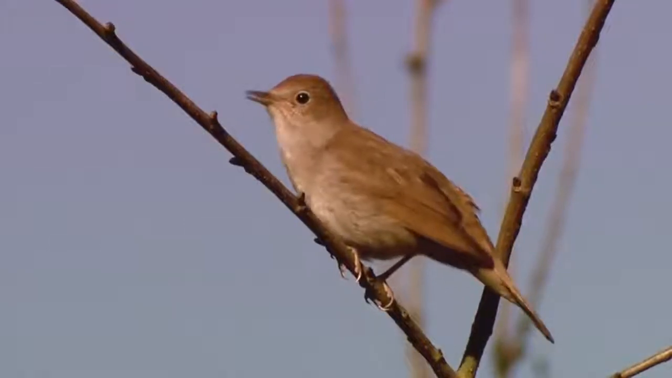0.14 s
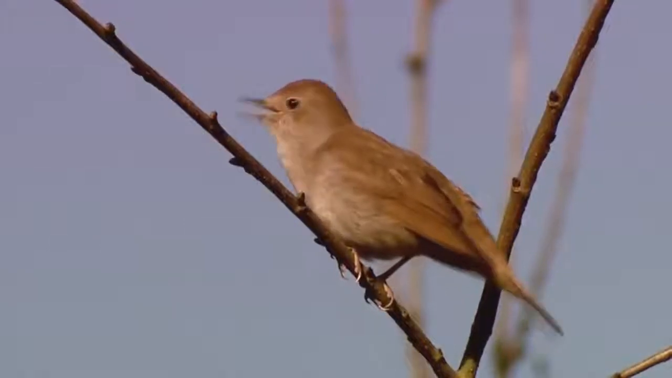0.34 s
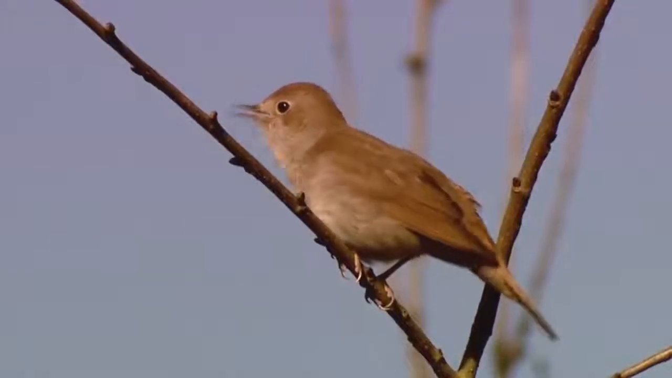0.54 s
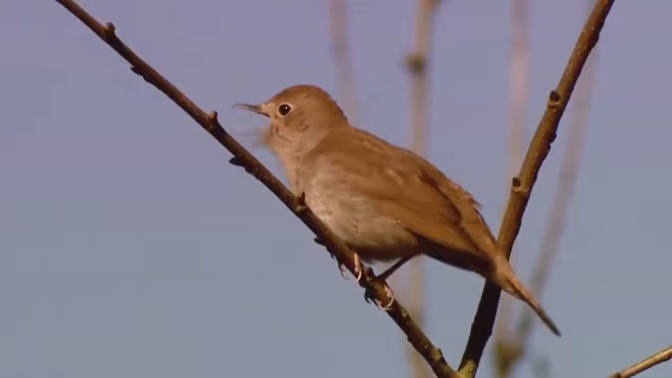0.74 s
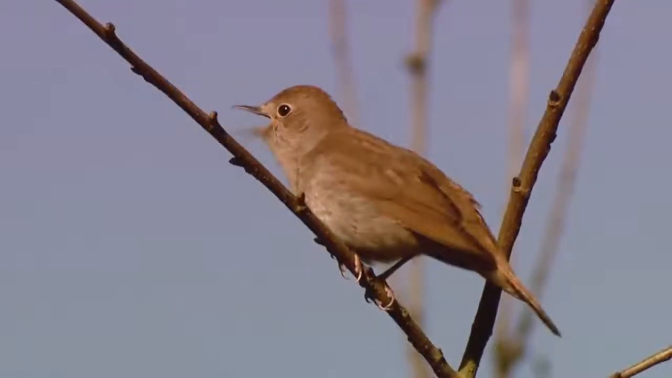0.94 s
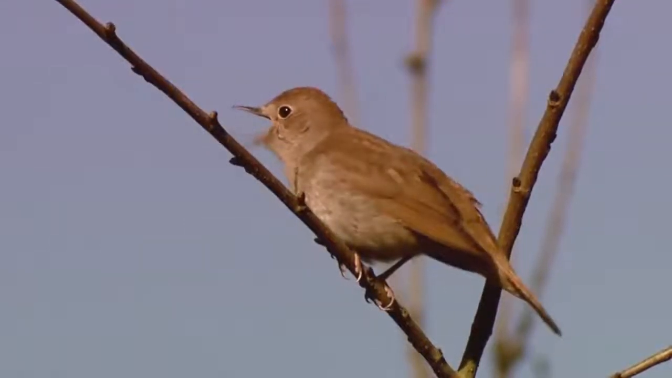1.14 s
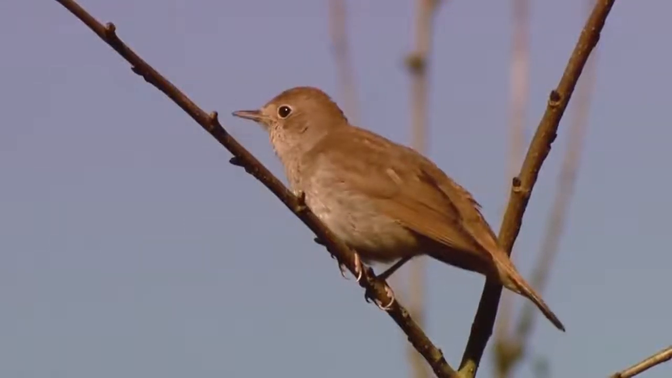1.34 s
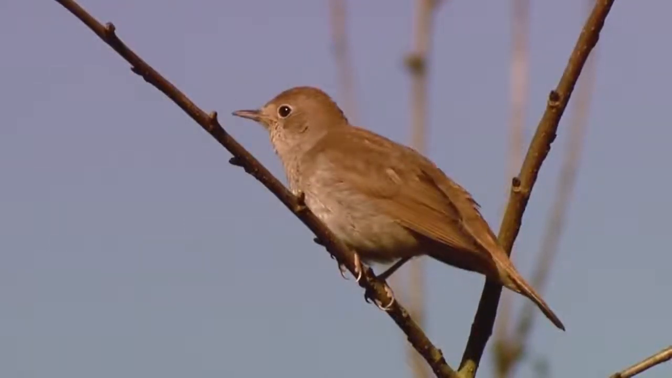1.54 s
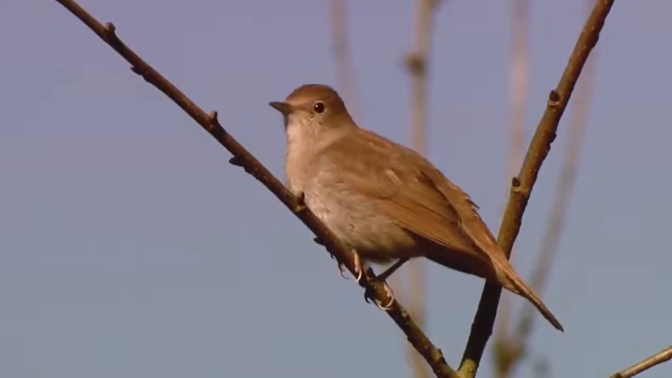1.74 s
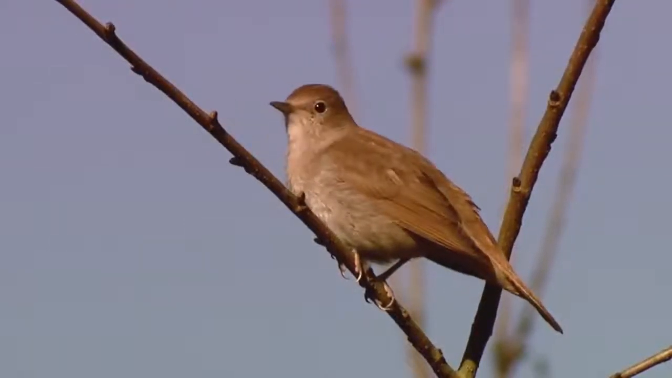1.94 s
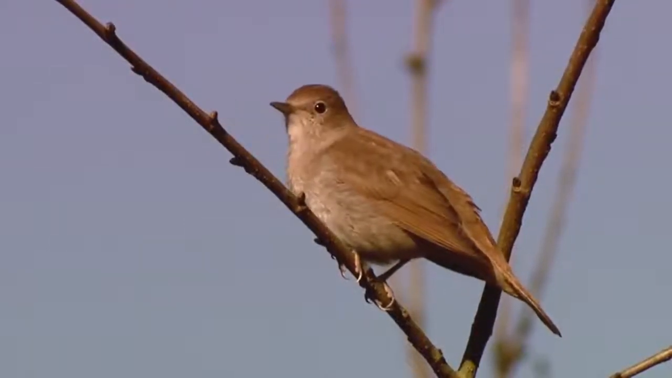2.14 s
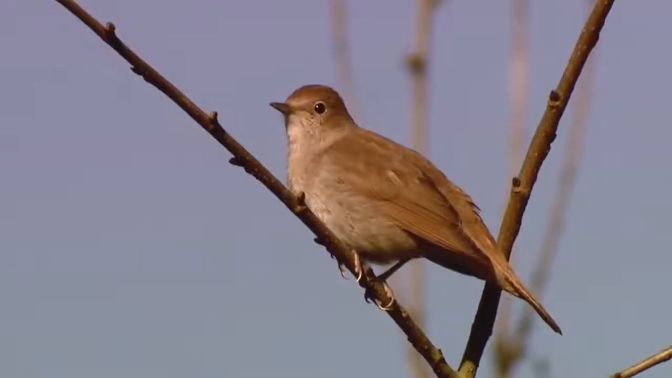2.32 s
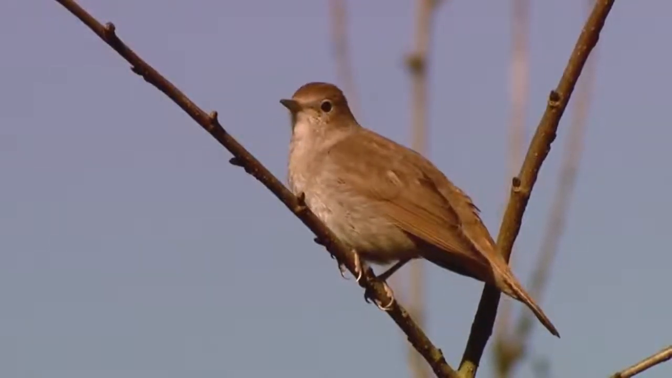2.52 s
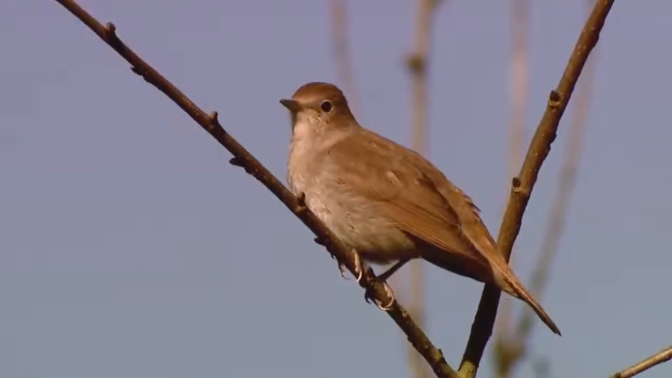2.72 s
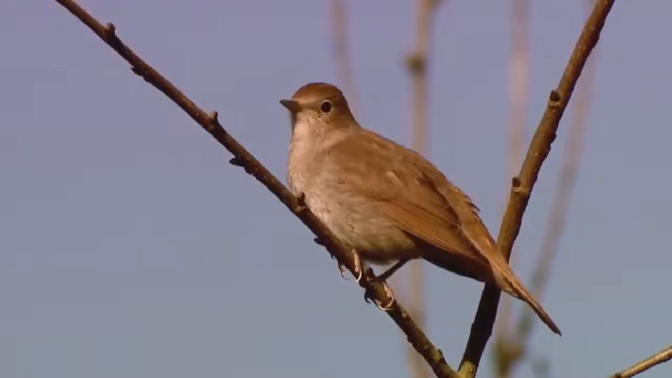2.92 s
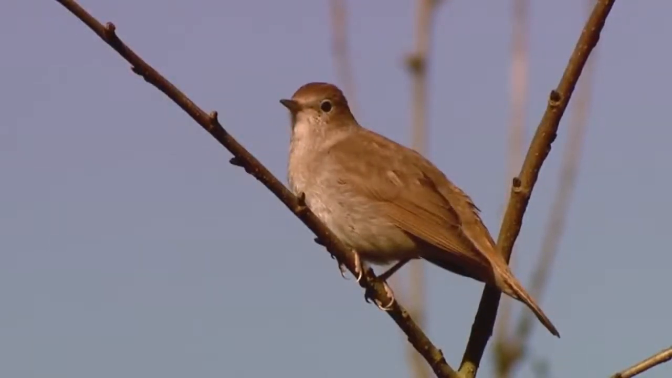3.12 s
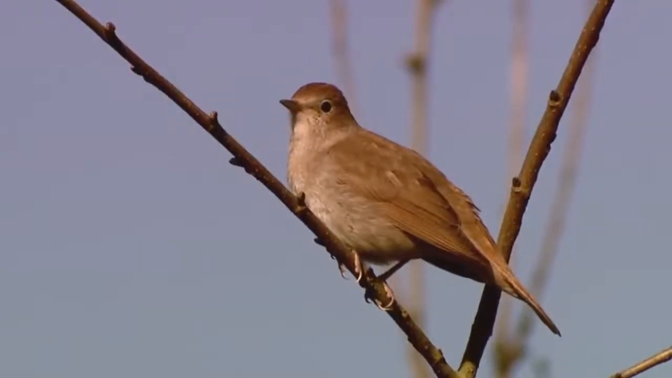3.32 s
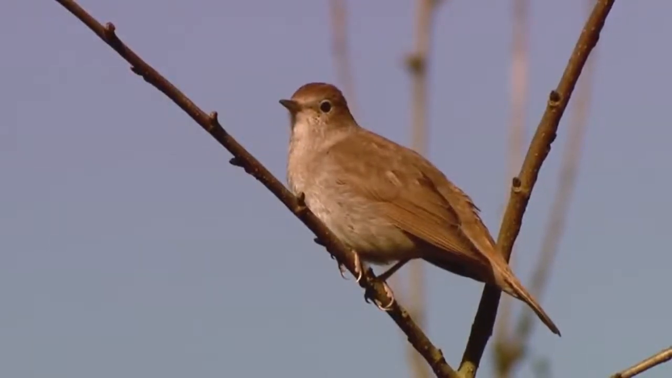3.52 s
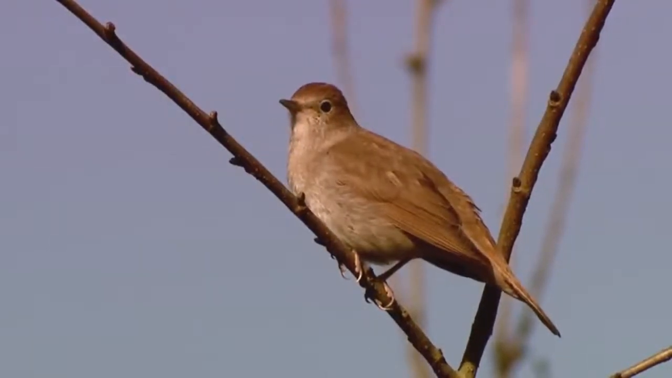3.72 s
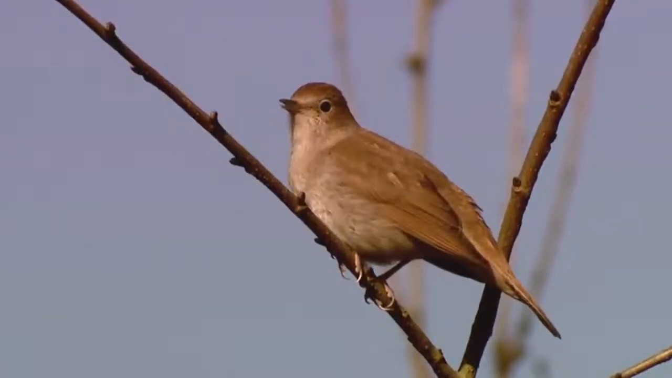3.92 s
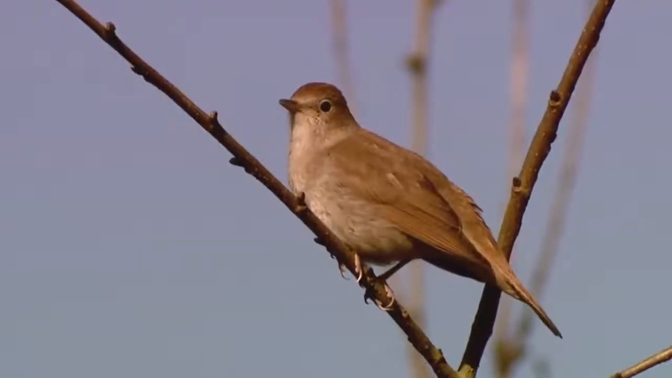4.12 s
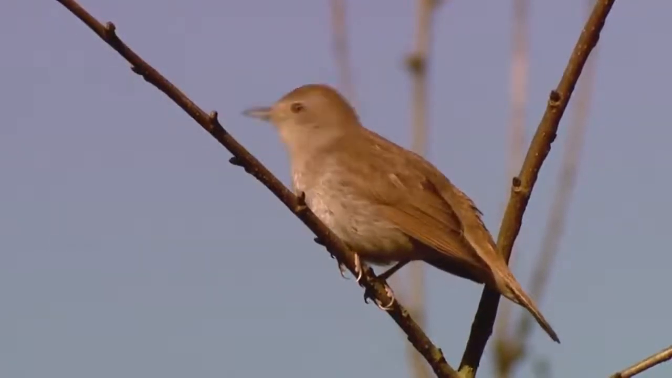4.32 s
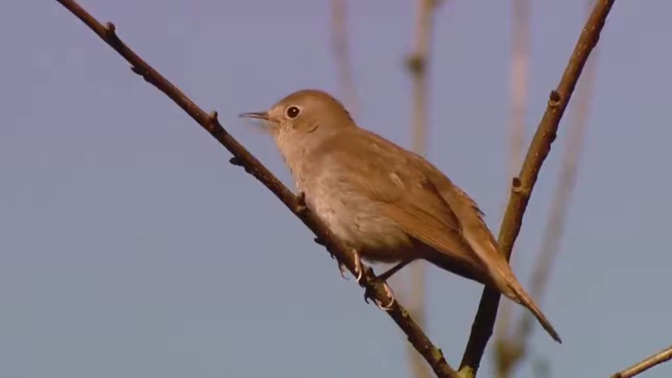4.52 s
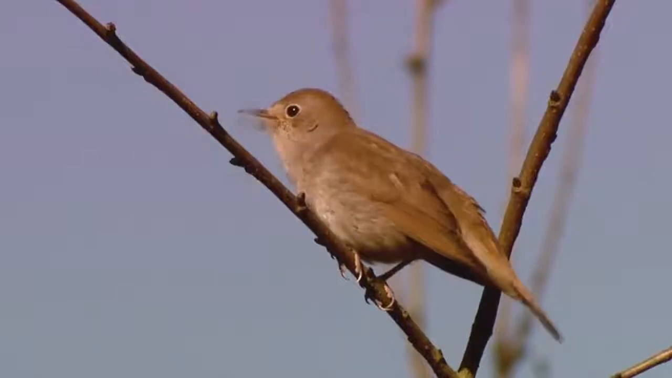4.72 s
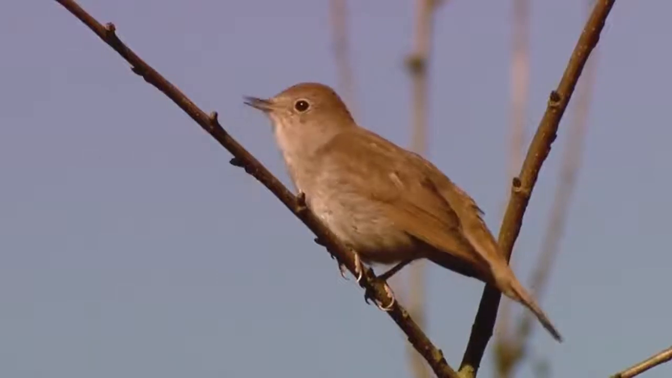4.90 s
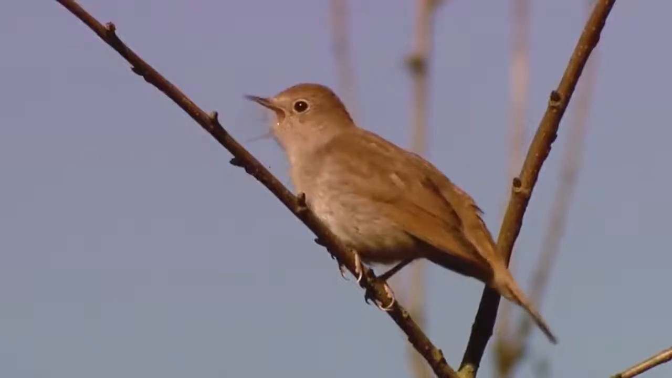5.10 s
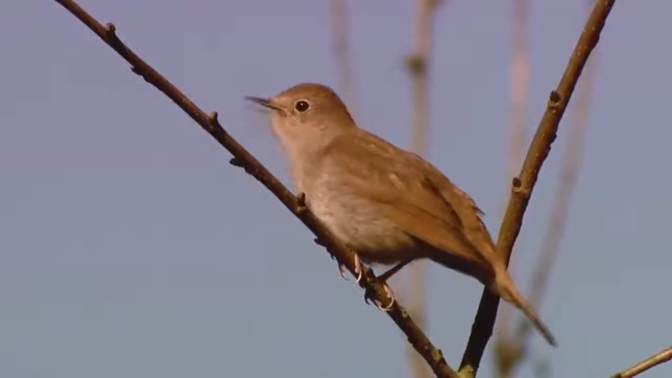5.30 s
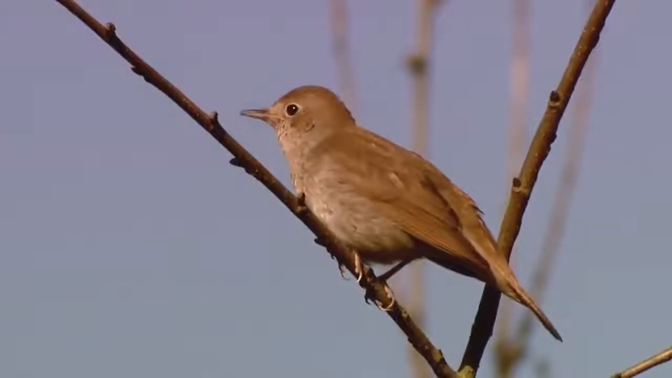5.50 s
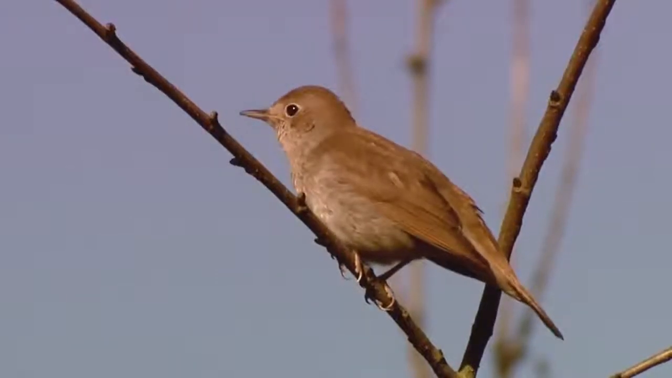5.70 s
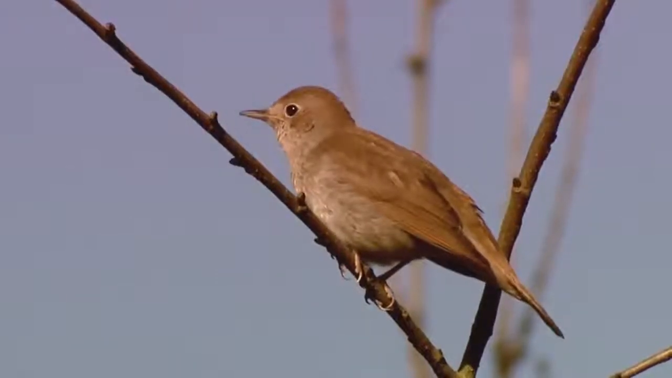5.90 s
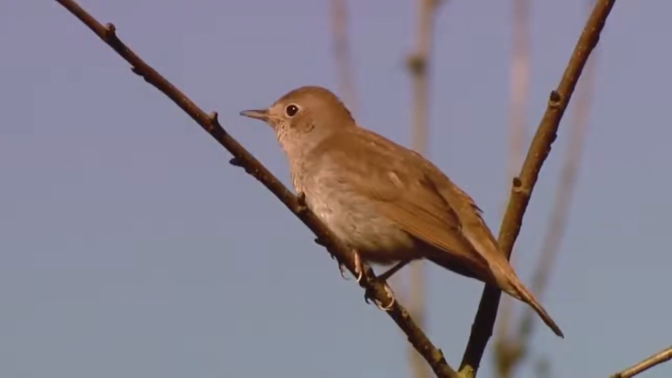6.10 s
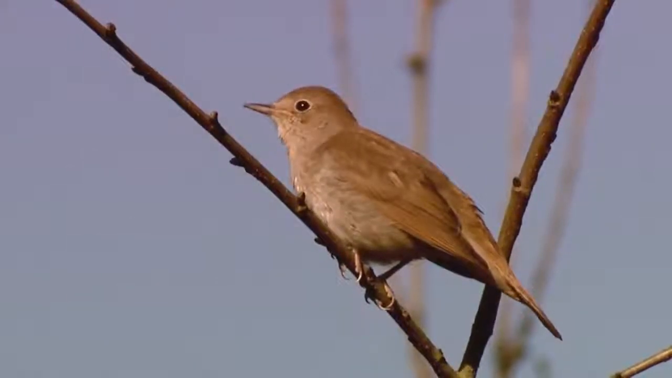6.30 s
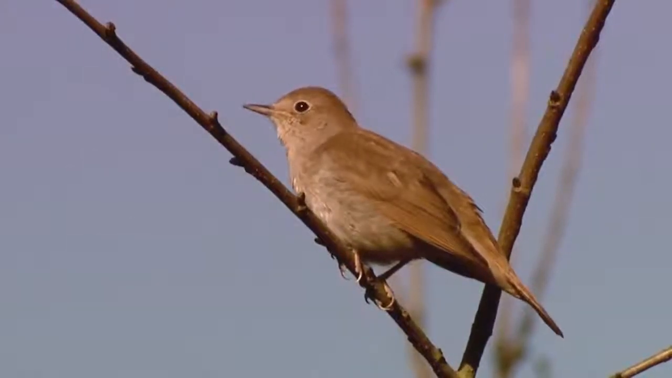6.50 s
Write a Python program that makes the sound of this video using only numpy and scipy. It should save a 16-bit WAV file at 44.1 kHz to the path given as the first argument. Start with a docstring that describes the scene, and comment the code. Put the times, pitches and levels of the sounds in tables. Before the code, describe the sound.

Close, nearly dry birdsong at a woodland edge, its loudest notes slightly overloaded. Bright whistles and clicks lead to a fast run of buzzing zips, fading by a second and a half. Distant low fluting and then high squeaky chirps fill the long gap. Near five seconds the close bird returns with rippling trills and three coarse two-toned notes, and thin birdsong trails off over soft hiss.

```python
"""A nightingale whistles close to the microphone over a faint outdoor hiss and deep-wood birds; tocks,
a squeak, chips, rasping upsweeps, then, after a rest, trills and three harsh two-voiced notes follow.
Its voices are sines on drawn pitch and level curves, roughened by pulsing, pitch shake and noise.
A fluty and a thin-voiced songbird sing farther off as gliding sines. Decaying scattered noise makes
the trees' echo; the loudest notes overload the recorder and clip."""
import sys
import numpy as np
from scipy import signal
from scipy.fft import rfft, irfft, next_fast_len
from scipy.io import wavfile
from scipy.ndimage import uniform_filter1d, map_coordinates

SR = 44100
rng = np.random.default_rng(int(sys.argv[2]) if len(sys.argv) > 2 else 0)


def wrap_up_sound(samples):
    """Save the sound to the file named by the first command line argument, as 16-bit audio."""
    columns = np.atleast_2d(samples).T
    # keep every value between -1 and 1, then stretch to whole-number steps
    tamed = np.clip(columns, -1, 1)
    steps = np.round(tamed * 32767).astype(np.int16)
    wavfile.write(sys.argv[1], SR, steps)


N = 288855  # samples


def amp(db):
    """Decibels to amplitude gain."""
    return 10 ** (np.asarray(db) / 20)


def along(points, hz):
    """Interpolate (f/Hz, value) points on a log frequency axis."""
    f, v = np.transpose(points)
    return np.interp(np.log(hz + 1), np.log(f), v)


def filtered(x, response):
    """Multiply the spectrum of x by response(hz)."""
    m = next_fast_len(N + 8192)
    spectrum = rfft(x, m) * response(np.fft.rfftfreq(m, 1 / SR))
    return irfft(spectrum, m)[:N]


def wobble(size, knots_per_s):
    """Smooth random curve through normally distributed knots."""
    knot_rng = np.random.default_rng(rng.integers(1 << 30))
    knots = knot_rng.standard_normal(int(size * knots_per_s / SR) + 4)
    return map_coordinates(knots, [np.arange(size) * knots_per_s / SR])


def phase(hz):
    """Integrate a moving pitch to phase in radians."""
    return 2 * np.pi * np.cumsum(hz) / SR


def gate(size, edge_s):
    """Window with sine-squared edges."""
    i = np.arange(size)
    ramp = np.minimum(i, i[::-1]) / (edge_s * SR)
    return np.sin(np.pi / 2 * np.minimum(ramp, 1)) ** 2


def add(track, start_s, sound):
    """Mix a sound into the track, cut at the track's ends."""
    i = round(start_s * SR)
    part = sound[max(-i, 0):max(N - i, 0)]
    track[max(i, 0):max(i, 0) + len(part)] += part


def progress(length_s):
    """Ramp 0 to 1 over a note."""
    return np.linspace(0, 1, int(length_s * SR))


def gesture(syllable, pitch, stretch):
    """Return a syllable's start offset in s, smooth pitch in Hz and gated gain per sample."""
    s, hz, db = np.transpose(syllable)
    s = np.sort(s) * stretch
    place = [np.interp(np.arange(s[0], s[-1], 1 / SR), s, np.arange(len(s)))]
    # spline through the points, in dB for level
    hz, db = (map_coordinates(v, place, mode="nearest") for v in (hz, db))
    return s[0], hz * pitch, amp(db) * gate(len(hz), 0.0016)


def glide(length_s, start_hz, middle_hz, end_hz, db, swell_db):
    """Return pitch on a parabola through three points, and gain with a linear dB swell and flutter."""
    u = np.linspace(-1, 1, int(length_s * SR))
    slope = (end_hz - start_hz) / 2
    curve = (start_hz + end_hz) / 2 - middle_hz
    hz = middle_hz + u * slope + u * u * curve
    flutter_db = 1.9 * wobble(len(u), 65.5)
    return hz, amp(db + swell_db * u / 2 + flutter_db) * gate(len(u), 0.0075)


FAR_ATTACK_S, FAR_RELEASE_S, FLUTTER_DB = 0.0074, 0.0057, 1.1


def far_note(hz, db, swell_db=0, rough=0):
    """Far bird's sine: gated, swelling or fading, fluttering; roughness is a fast pitch shake."""
    t = np.arange(len(hz)) / SR
    ramp = np.clip(np.minimum(t / FAR_ATTACK_S, t[::-1] / FAR_RELEASE_S), 0, 1)
    edges = np.sin(np.pi / 2 * ramp) ** 2
    level_db = db + swell_db * (t / t[-1] - .5) + FLUTTER_DB * wobble(len(t), 73)
    shaken_hz = hz * (1 + rough * wobble(len(t), 648))
    return amp(level_db) * edges * np.sin(phase(shaken_hz))


# Outdoor hiss spectrum: f/Hz, relative level/dB
HISS_SPECTRUM = [(25, -10), (50, -23.5), (100, -21.5), (135, -7.5), (190, 0.5), (300, -1), (750, 0.5),
                 (1200, -6), (1900, -1.5), (2400, -8.5), (3100, -3.5), (4900, -14.5), (12000, -22),
                 (14500, -32)]


def hiss(rms_db=-41.5):
    """Steady outdoor background: noise shaped in frequency."""
    air = filtered(rng.standard_normal(N), lambda hz: amp(along(HISS_SPECTRUM, hz)))
    return air / air.std() * amp(rms_db)


# Mean level of the deep-wood birds: t/s, level/dB
CHATTER = [(0, -55), (1.3, -50), (2.3, -50), (3.2, -47), (4.1, -49.5), (4.7, -52), (5.7, -48.5), (6.5, -64)]


def chorus(count=140, centre_hz=3200, spread=0.42, slide=0.11, scatter_db=2):
    """Birds deep in the wood: faint slurs at random times and pitches."""
    out = np.zeros(N)
    draws = rng.standard_normal((count, 6))
    for i, (when, pitch, first, last, life, level) in enumerate(draws):
        middle_hz = centre_hz * np.exp(spread * np.tanh(pitch))
        start_hz, end_hz = middle_hz * np.exp(slide * first), middle_hz * np.exp(slide * last)
        length_s = 0.069 * np.exp(0.27 * life)
        s = (i + when) / count * N / SR
        db = np.interp(s, *np.transpose(CHATTER)) + scatter_db * level
        hz, gain = glide(length_s, start_hz, middle_hz, end_hz, db, 0)
        add(out, s, gain * np.sin(phase(hz)))
    return out


# Near bird's syllables, before each note's scaling: t/s from the note's time, f/Hz, level/dB
WHISTLE = [(-.012, 2656, -18.5), (0, 2749, -12), (0.014, 2675, -4), (0.027, 2719, 2), (.037, 2722, 2),
           (0.051, 2658, 3.5), (0.061, 2382, 0), (0.07, 2010, -5.5), (0.082, 1603, -15), (0.096, 1476, -23)]
TOCK = [(0, 2040, 1.5), (.003, 1610, -1), (.008, 1353, -3.5), (0.018, 1184, -19)]
CHIP = [(0, 3600, -11), (.004, 3090, -1.5), (.009, 2740, 0.5), (.016, 2340, -3.5), (0.019, 2346, -6),
        (0.027, 2430, -16)]
CHOP = [(0, 3750, -13.5), (.004, 3090, -1), (.008, 2685, -0.5), (0.012, 2180, -6), (0.017, 1830, -15.5),
        (.024, 1600, -22)]
TRILL = [(0, 1592, -25.5), (.011, 1880, -14.5), (.024, 2992, -0.5), (.041, 2026, -10), (.058, 3028, 1.5),
         (.077, 1930, -12), (.097, 3092, -1), (0.112, 1940, -15.5)]
# Clear notes: t/s, syllable, pitch/ratio, length/ratio, level/dB
CLEAR = [(0, WHISTLE, 1, 1.004, -0.5), (.195, WHISTLE, 1, 0.81, 0), (0.36, TOCK, .98, 1.1, -18),
         (0.396, TOCK, 0.98, 1.04, -15.5), (.431, TOCK, 1.01, 0.91, -13), (.470, TOCK, 0.99, 0.84, -13),
         (.521, TOCK, 2.1, 0.3, -21.5), (.665, CHIP, 1, 1.04, 0.74), (.701, CHOP, 1, 1.01, 1.5),
         (4.918, TRILL, 0.98, 1.007, -5), (5.117, TRILL, 1, 1.02, -0.5)]


def clear_notes(second_db=-41, third_db=-50, waver=0.0025):
    """One side of the syrinx sings alone: almost pure tone, weak 2nd and 3rd harmonics."""
    out = np.zeros(N)
    for s, syllable, pitch, stretch, db in CLEAR:
        lead_s, hz, gain = gesture(syllable, pitch, stretch)
        p = phase(hz * (1 + waver * wobble(len(hz), 300)))
        tone = np.sin(p) + amp(second_db) * np.sin(2 * p) + amp(third_db) * np.sin(3 * p)
        add(out, s + lead_s, amp(db) * gain * tone)
    return out


# Tree echo decay: f/Hz, t60/s
TREE_DECAY = [(1200, 0.71), (2700, 0.62), (5500, 0.46), (10000, 0.43)]


def trees(x, gap_s=0.00087, build_s=0.0009, echoes_per_s=350, wash=0.047):
    """Separate echoes from trunks over a soft wash from the twigs; treble dies first."""
    echoes = rng.random(SR) < echoes_per_s / SR
    scatter = rng.standard_normal(SR) * (wash + echoes)
    hz, t, z = signal.stft(scatter, SR, nperseg=256)
    decay = amp(-60 * t / along(TREE_DECAY, hz)[:, None])
    tail = signal.istft(z * decay, SR, nperseg=256)[1]
    since_gap_s = np.maximum(np.arange(len(tail)) / SR - gap_s, 0)
    tail = tail * (1 - np.exp(-since_gap_s / build_s))
    return signal.fftconvolve(x, tail / np.linalg.norm(tail))[:N]


# Air rushing through the syrinx: f/Hz, relative level/dB
TURBULENCE = [(1200, -16.5), (3000, -17), (6000, 1), (8500, -11.5), (12000, -14), (15000, -25)]


def turbulence(voice, db):
    """Gritty rush of air: shaped noise that follows a voice's strength."""
    air = filtered(rng.standard_normal(N), lambda hz: amp(along(TURBULENCE, hz)))
    strength = uniform_filter1d(np.abs(voice), size=40)
    return amp(db) * air / air.std() * strength


# Squeak's two voices, before scaling: t/s, f/Hz, level/dB
SQUEAK = [(0, 3900, -43), (.007, 4700, -16.5), (0.014, 4740, -9), (0.021, 4920, -6.5), (.028, 5020, -5.5)]
HOOK = [(0, 3550, -22.5), (.01, 3440, -18.5), (0.021, 3585, -11), (.029, 3780, -7), (.036, 4100, -3),
        (0.042, 4330, -9.5), (.044, 3460, -3), (0.049, 2670, -25)]


def squeak(square=0.039, cube=0.21, air_db=-28):
    """Two clear voices overlap and distort each other into faint extra tones."""
    pair = np.zeros(N)
    for s, syllable in ((.565, SQUEAK), (.574, HOOK)):
        _, hz, gain = gesture(syllable, 0.97, 0.95)
        add(pair, s, gain * np.sin(phase(hz)))
    distortion = square * pair ** 2 + cube * pair ** 3
    tilt = [(1000, -60), (5500, 9), (8000, 13.5), (14000, -14)]  # f/Hz, gain/dB
    extra = filtered(distortion, lambda hz: amp(along(tilt, hz)))
    return pair + extra + turbulence(pair, air_db)


# Fluty bird's drawn-out notes, before the common gain: t/s, f/Hz, level/dB
RISE = [(1.595, 1911, -26), (1.651, 2153, -21.5), (1.683, 2270, -25), (1.789, 2285, -22.5),
        (1.815, 2760, -25.5), (1.825, 2720, -23)]
SCOOP = [(1.912, 1370, -37), (1.938, 1494, -31.5), (1.963, 1920, -19.5)]
SWOOP = [(2.432, 1080, -37), (2.452, 1493, -32), (2.48, 1710, -31), (2.535, 1795, -32)]
CREST = [(3.052, 2370, -38), (3.066, 2359, -27.5), (3.112, 2700, -26.5), (3.18, 2421, -25.5),
         (3.248, 2375, -29), (3.384, 2357, -38), (3.39, 2375, -32)]
# Plain whistles: t/s, length/s, start f/Hz, end f/Hz, level/dB
FLUTES = [(0.769, 0.11, 1660, 1850, -28), (1.40, .095, 2300, 2010, -34), (1.49, 0.2, 2020, 2290, -33.5),
          (1.596, 0.059, 2510, 2560, -34.5), (1.826, 0.091, 2260, 2176, -30.5),
          (2.08, 0.099, 2100, 1763, -34.5), (2.135, 0.033, 2425, 2520, -24.5),
          (2.318, 0.12, 2420, 2266, -30.5), (2.35, .098, 1774, 2086, -33), (2.362, .075, 935, 1050, -43),
          (2.573, 0.12, 1688, 1582, -29.5), (2.748, 0.16, 1820, 1802, -21.5),
          (4.05, 0.067, 2036, 1880, -39.5)]
# Warbles: t/s, length/s, start f/Hz, end f/Hz, level/dB, flick height/share of pitch, flick rate/Hz
WARBLES = [(0.95, 0.19, 2270, 1798, -23.5, 0.073, 35.3), (1.284, 0.19, 1500, 1648, -27, .15, 73),
           (1.959, .125, 1846, 1690, -20, .6, 39.5)]
FLUTE_SWELL_DB, WARBLE_SWELL_DB = 6.5, 0.5
FLICK_S, FLICK_DIP_DB = 0.0028, 7.5  # flick time constant; level dip at its peak


def fluty_bird(drawn_db=3, waver=0.005, rough=0.0025):
    """Mellow low whistles: drawn out, plain, or broken by quick upward flicks."""
    out = np.zeros(N)
    for note in (RISE, SCOOP, SWOOP, CREST):
        s, hz, gain = gesture(note, 1, 1)
        tone = np.sin(phase(hz * (1 + waver * wobble(len(hz), 145.7))))
        add(out, s, amp(drawn_db) * gain * gate(len(hz), FAR_ATTACK_S) * tone)
    for s, length_s, start_hz, end_hz, db in FLUTES:
        hz = start_hz + (end_hz - start_hz) * progress(length_s)
        add(out, s, far_note(hz, db, FLUTE_SWELL_DB, rough))
    for s, length_s, start_hz, end_hz, db, height, rate_hz in WARBLES:
        u = progress(length_s)
        from_peak_s = np.abs(u * length_s * rate_hz % 1 - .5) / rate_hz
        flicks = np.exp(-from_peak_s / FLICK_S)
        hz = (start_hz + (end_hz - start_hz) * u ** 2) * (1 + height * flicks)
        add(out, s, far_note(hz, db - FLICK_DIP_DB * flicks, WARBLE_SWELL_DB, rough))
    return out


def tree_line(x, delay_s=0.11):
    """One distinct echo from the edge of the wood."""
    out = np.zeros(N)
    add(out, delay_s, x)
    return out


# Zip's two voices, before scaling: t/s from the loudest instant, f/Hz, level/dB
UPSWEEP = [(-.02, 1900, -18), (-.012, 2350, -21.5), (-.006, 3050, -14.5), (-.003, 4050, -11),
           (0, 5400, -0.5), (.002, 6060, -9.5), (.004, 7150, -20), (.008, 7600, -29.5)]
RASP = [(-.027, 3450, -3), (-.02, 4050, -6.5), (-.012, 4650, -3.5), (-.006, 5350, -2.5),
        (-.003, 5700, -5.5), (-.001, 5900, -24)]
# Rasping upsweeps: t/s of the loudest instant, pitch/ratio, level/dB
ZIPS = [(.803, 1.09, -5), (0.8843, 1.02, -5), (.954, 1.02, -5.5), (1.029, 1.02, -6), (1.1043, 1.07, -7),
        (1.1791, 1.054, -8.5), (1.2529, 1.106, -9), (1.3334, 1.11, -11), (1.4133, 1.115, -13)]
RASP_DB = -1.1  # re sweep


def zips(buzz_hz=600, jitter=0.087, bend_rad=1.68, rough=0.021, rasp_air_db=-12, sweep_air_db=-22):
    """One voice is chopped into fast pulses; the other whips up through the throat's resonance."""
    sweeps, rasps = np.zeros(N), np.zeros(N)
    for s, pitch, db in ZIPS:
        lead_s, hz, gain = gesture(UPSWEEP, pitch, 0.99)
        add(sweeps, s + lead_s, amp(db) * gain * np.sin(phase(hz)))
        lead_s, hz, gain = gesture(RASP, pitch, 1)
        # buzz_hz scales with each note's pitch ratio
        buzz = phase(buzz_hz * pitch * (1 + jitter * wobble(len(hz), 565)))
        # pitch slides within every pulse: comb of sidebands
        p = phase(hz * (1 + rough * wobble(len(hz), 1500))) + bend_rad * np.cos(buzz)
        swell = 1 - np.exp(-np.arange(len(hz)) / (.004 * SR))
        pulses = np.exp(.7 * (np.cos(buzz) - 1))
        add(rasps, s + lead_s, amp(db + RASP_DB) * gain * swell * pulses * np.sin(p))
    return sweeps + rasps + turbulence(rasps, rasp_air_db) + turbulence(sweeps, sweep_air_db)


# Thin song's slurs: t/s, length/s, start f/Hz, end f/Hz, level/dB
SLURS = [(2.105, 0.064, 5200, 3700, -46), (2.455, .05, 6900, 4100, -47.5),
         (2.831, 0.071, 6300, 3920, -38.5), (2.965, 0.077, 6300, 3820, -37.5), (3.1, 0.07, 6350, 3860, -37),
         (3.295, 0.069, 6100, 4780, -37.5), (3.926, .03, 6400, 4400, -36), (5.182, .036, 6700, 4150, -29),
         (5.286, 0.033, 6800, 4410, -30.5), (5.386, 0.037, 6700, 4295, -31), (5.485, .032, 6700, 4300, -36),
         (5.582, 0.061, 6700, 3520, -37.5), (5.681, 0.047, 6700, 3400, -33), (5.78, 0.046, 6700, 3500, -33)]
SLUR_STEEPNESS, SLUR_FADE_DB = 1.4, 11


def slurs(rough=.011):
    """Each slur drops steeply, slows its fall and fades."""
    out = np.zeros(N)
    for s, length_s, start_hz, end_hz, db in SLURS:
        drop = 1 - np.exp(-SLUR_STEEPNESS * progress(length_s))
        hz = start_hz + (end_hz - start_hz) * drop / drop[-1]
        add(out, s, far_note(hz, db, -SLUR_FADE_DB, rough))
    return out


# Chirps: t/s, length/s, start f/Hz, end f/Hz, mid-note bow/share of pitch, level/dB
CHIRPS = [(2.149, 0.035, 3340, 3250, 0, -35), (2.444, .045, 2500, 4790, -.12, -42),
          (2.514, 0.03, 6770, 6800, -.13, -41.5), (2.63, .052, 7400, 7450, -.1, -48),
          (3.208, .06, 4000, 6840, .04, -44), (3.225, 0.16, 7800, 7460, 0.018, -45.5),
          (3.251, .15, 3650, 3470, -0.016, -35.5), (3.557, .03, 5900, 6650, 0.073, -35),
          (3.582, 0.034, 6540, 6900, -0.047, -28.5), (3.938, 0.022, 4420, 4000, -0.021, -25.5),
          (3.974, 0.079, 7600, 6550, .02, -41), (4.418, 0.12, 2500, 3100, 0.14, -39),
          (5.879, .03, 7460, 6600, .01, -41), (6.113, 0.056, 5290, 4320, -0.0069, -29),
          (6.298, 0.058, 7950, 7080, 0.00031, -39.5), (6.357, 0.047, 2310, 2670, .03, -34)]


def chirps(rough=0.012):
    """Short, slightly rough glides, bowed up or down in the middle."""
    out = np.zeros(N)
    for s, length_s, start_hz, end_hz, bow, db in CHIRPS:
        u = progress(length_s)
        hz = (start_hz + (end_hz - start_hz) * u) * (1 + bow * np.sin(np.pi * u))
        add(out, s, far_note(hz, db, 0, rough))
    return out


# Held whistles: t/s, length/s, start f/Hz, held f/Hz, level/dB, swell/dB
HOLDS = [(2.724, 0.052, 6270, 6070, -37, -4), (3.42, 0.097, 5750, 4825, -28, 6),
         (4.136, 0.077, 6360, 5610, -35, 20), (4.364, 0.086, 6200, 5560, -32, 18),
         (4.612, 0.095, 6050, 5460, -27.5, 33), (4.855, .04, 5520, 5480, -34, 5),
         (5.063, 0.072, 5740, 5530, -30, 8), (5.898, .165, 6400, 6750, -37, -15)]
SETTLE_S = .014  # time constant


def holds(rough=0.0047):
    """Each whistle slides exponentially toward its held pitch."""
    out = np.zeros(N)
    for s, length_s, start_hz, held_hz, db, swell_db in HOLDS:
        settling = np.exp(-progress(length_s) * length_s / SETTLE_S)
        hz = held_hz + (start_hz - held_hz) * settling
        add(out, s, far_note(hz, db, swell_db, rough))
    return out


# Hoarse notes: t/s, length/s, start f/Hz, end f/Hz, level/dB
HOARSE = [(3.435, 0.052, 4420, 3900, -31.5), (3.554, 0.059, 4660, 4570, -32.5),
          (3.612, 0.047, 4280, 4270, -30.5), (3.649, 0.097, 2940, 2780, -36.5),
          (3.77, 0.11, 3970, 4780, -34), (3.996, .055, 3220, 3130, -33), (4.122, 0.1, 4050, 3370, -37.5),
          (6.138, 0.054, 3000, 2890, -43), (6.196, .05, 3650, 4300, -40.5)]


def hoarse_notes(rough=0.0486):
    """Glides whose pitch shakes so fast that they turn to a rasp."""
    out = np.zeros(N)
    for s, length_s, start_hz, end_hz, db in HOARSE:
        hz = start_hz + (end_hz - start_hz) * progress(length_s)
        add(out, s, far_note(hz, db, 0, rough))
    return out


# See-saw's low and high halves, before time scaling: t/s, f/Hz, level/dB
FLICK = [(0, 4580, -44), (.005, 4850, -32.5), (.012, 5180, -28.5), (0.02, 5800, -31), (.023, 6200, -37)]
ARCH = [(0, 7540, -45), (.04, 7750, -44), (.085, 7300, -47), (.13, 6980, -43.5)]
SEESAW_START_S, SEESAW_PERIOD_S, ARCH_AFTER_S = 4.0532, .1885, 0.048


def seesaw(count=5, rough=.007):
    """A flick and a high arch alternate at a steady pace."""
    out = np.zeros(N)
    for s in SEESAW_START_S + SEESAW_PERIOD_S * np.arange(count):
        for after_s, syllable in ((0, FLICK), (ARCH_AFTER_S, ARCH)):
            _, hz, gain = gesture(syllable, 1, 0.97)
            shaken_hz = hz * (1 + rough * wobble(len(hz), 650))
            add(out, s + after_s, gain * np.sin(phase(shaken_hz)))
    return out


def thin_song():
    """High slurs, whistles and chirps; the hoarse notes carry more echo."""
    pure = slurs() + holds() + chirps() + seesaw()
    hoarse = hoarse_notes()
    return pure + amp(-7.5) * trees(pure) + hoarse + amp(-3) * trees(hoarse)


# Harsh note's two voices, before scaling: t/s, f/Hz, level/dB
HARSH_LOW = [(0, 1790, -23), (.011, 1920, -13.5), (.021, 2070, -7.5), (.027, 2130, 1.5), (.033, 2003, -1),
             (.039, 1800, -6.5), (.046, 1455, -2.5), (.055, 1160, -13)]
HARSH_HIGH = [(0, 3080, -9), (.006, 3170, -3.5), (.013, 3400, -1.5), (.019, 3620, -3.5), (.025, 3760, -12)]
# Two-voiced notes: t/s, pitch/ratio, length/ratio, level/dB
HARSH = [(5.305, 1.063, 0.91, -11), (5.400, 0.98, 0.98, -9), (5.516, .985, 0.95, -10.5)]
# Low voice's overtones: multiple of f, level/dB
LOW_OVERTONES = [(1, -17), (3, -17), (4, -38), (5, -36), (6, -33.5)]
# Tones of both voices: multiple of low f, multiple of high f, level/dB
MIXING = [(1, 1, -0.5), (2, 1, -37), (0, 1, -11.5), (0, 2, -9), (1, 2, -27), (3, 1, -29)]


def harsh_notes(rough=0.01, high_rough=.022, shimmer=0.31):
    """Both voices sound and make sum tones; then the low falls alone, strongest in its octave."""
    out = np.zeros(N)
    for s, pitch, stretch, db in HARSH:
        _, hz, gain = gesture(HARSH_LOW, pitch, stretch)
        low = phase(hz * (1 + rough * wobble(len(hz), 1240)))
        overtones = sum(amp(level_db) * np.sin(round(k) * low) for k, level_db in LOW_OVERTONES)
        add(out, s, amp(db) * (gain * np.sin(2 * low) + np.sqrt(gain) * overtones))
        _, hz, gain = gesture(HARSH_HIGH, pitch, stretch)
        high = phase(hz * (1 + high_rough * wobble(len(hz), 1600)))
        low = low[:len(high)]
        tones = sum(amp(level_db) * np.sin(round(j) * low + round(k) * high)
                    for j, k, level_db in MIXING)
        unsteady = 1 + shimmer * wobble(len(hz), 2500)
        add(out, s, amp(db) * gain * gate(len(hz), 0.0011) * unsteady * tones)
    return out


def ticks(start_s=6.368, gap_s=.0267, db=-44):
    """The thin song ends in a dry rattle of steep downward flicks."""
    out = np.zeros(N)
    for s in np.arange(start_s, N / SR, gap_s):
        hz, gain = glide(0.016, 6950, 5700, 4100, db, 0)
        add(out, s, gain * np.sin(phase(hz)))
    return out


def scene():
    """Near bird almost dry; the far ones with more of the wood's echo."""
    harsh = harsh_notes()
    clear = clear_notes() + squeak()
    raspy = zips() + harsh + turbulence(harsh, db=-23)
    near = clear + raspy + amp(-13.5) * trees(clear) + amp(-11) * trees(raspy)
    fluty, deep = fluty_bird(), chorus()
    fluty_echo = amp(-20.5) * tree_line(fluty) + amp(-8.5) * trees(fluty)
    far = fluty + fluty_echo + thin_song() + ticks()
    return (near + far + deep + amp(-2) * trees(deep) + hiss())[None]


def record(dry, ceiling=0.99, top_hz=15400):
    """Clip the loudest notes flat, then remove everything above the band limit."""
    clipped = np.clip(dry[0], -ceiling, ceiling)
    return filtered(clipped, lambda hz: hz < top_hz)[None]


dry = scene()
out = record(dry)
wrap_up_sound(out)
```